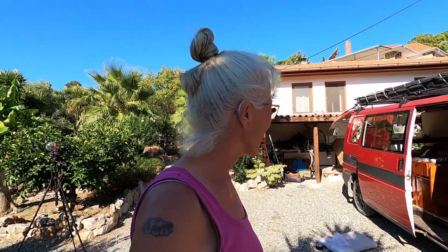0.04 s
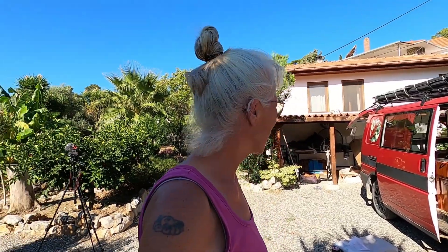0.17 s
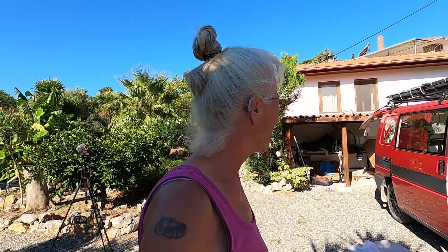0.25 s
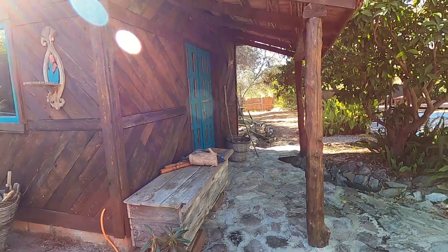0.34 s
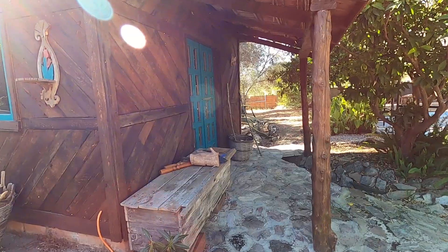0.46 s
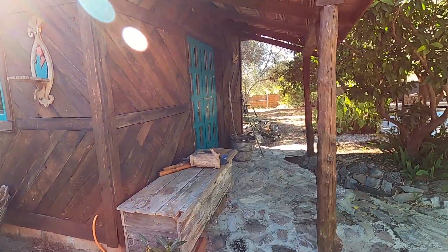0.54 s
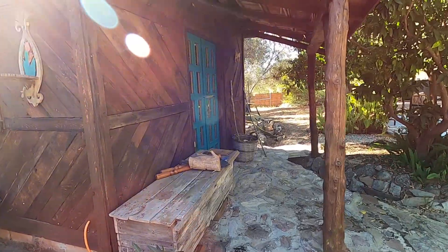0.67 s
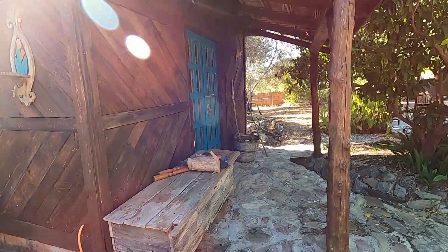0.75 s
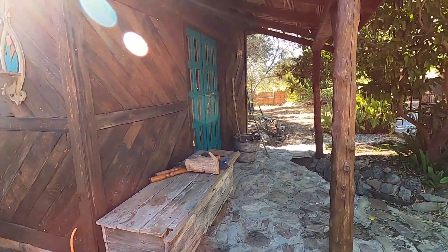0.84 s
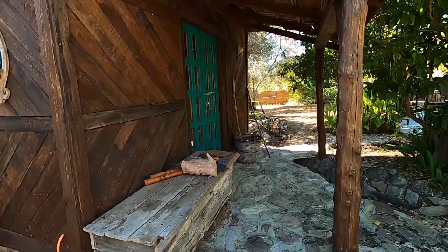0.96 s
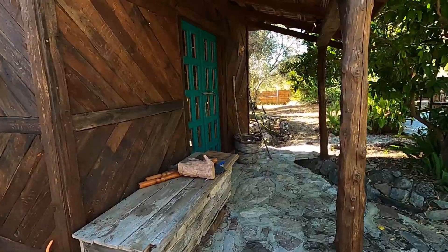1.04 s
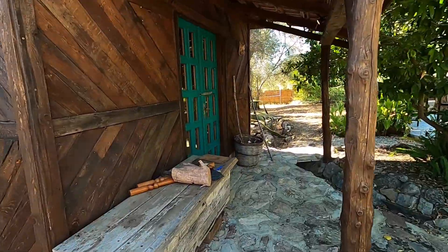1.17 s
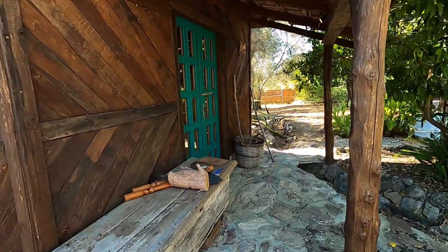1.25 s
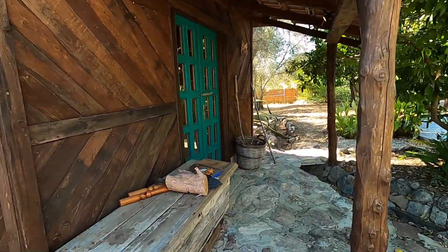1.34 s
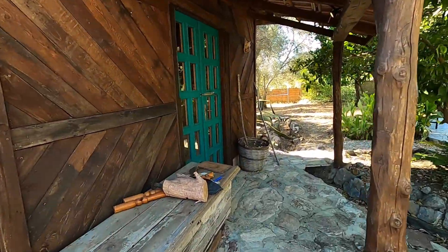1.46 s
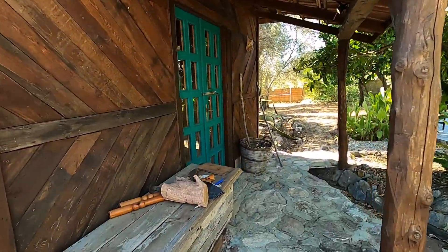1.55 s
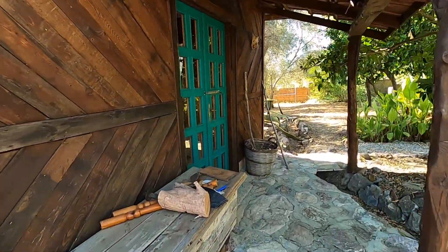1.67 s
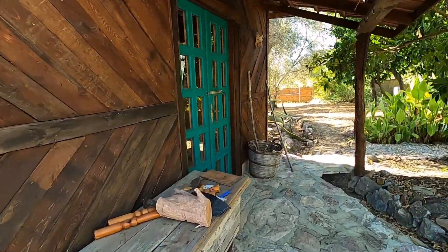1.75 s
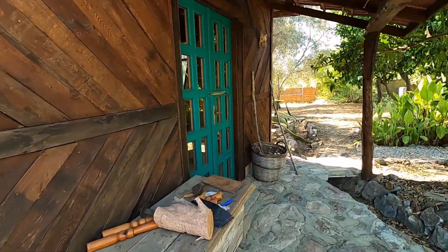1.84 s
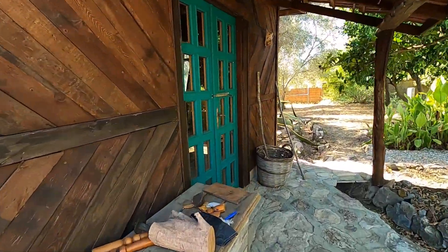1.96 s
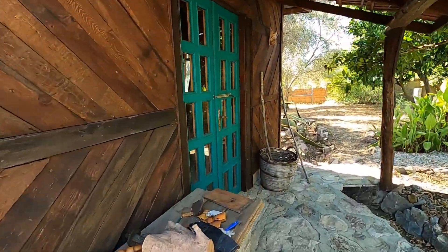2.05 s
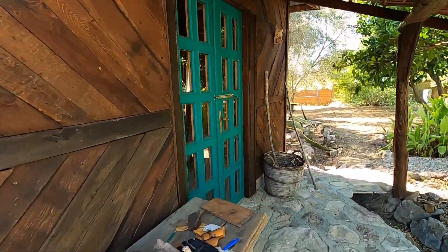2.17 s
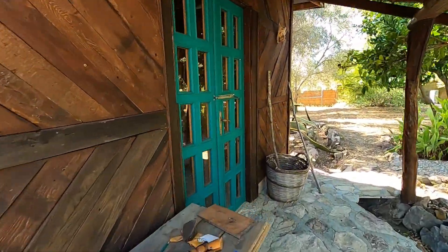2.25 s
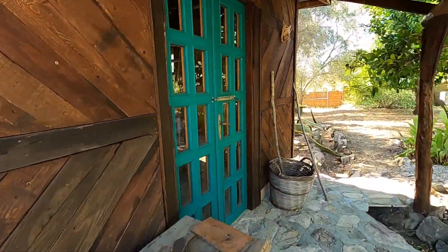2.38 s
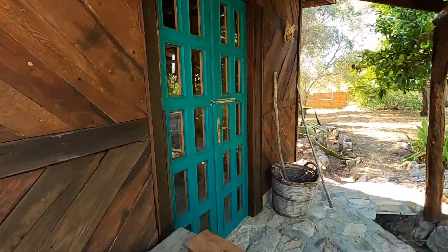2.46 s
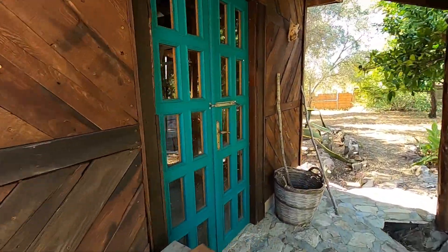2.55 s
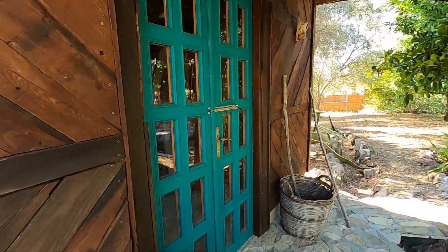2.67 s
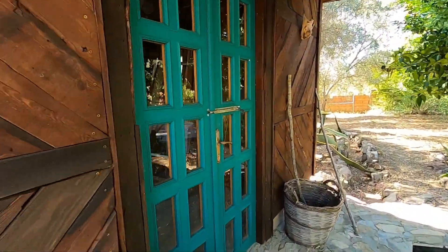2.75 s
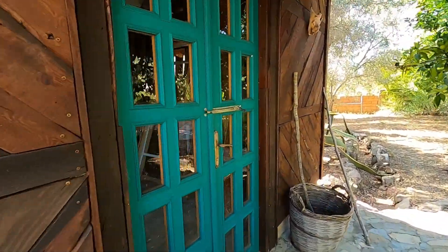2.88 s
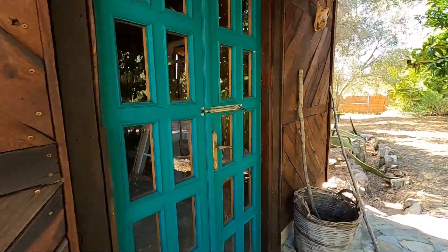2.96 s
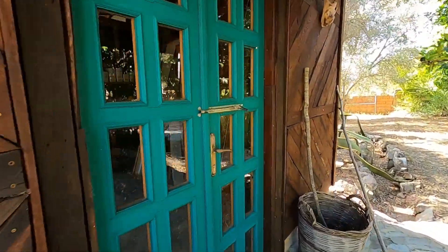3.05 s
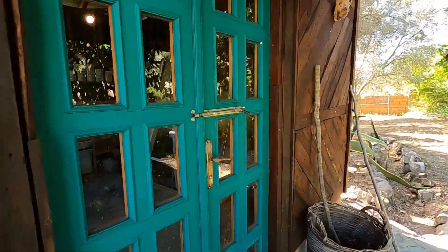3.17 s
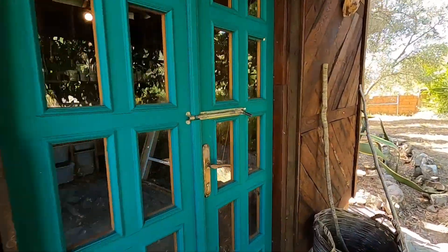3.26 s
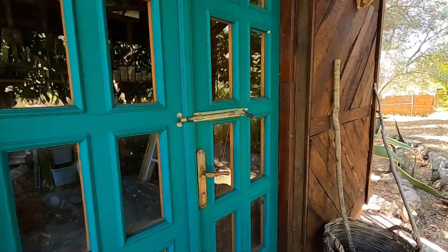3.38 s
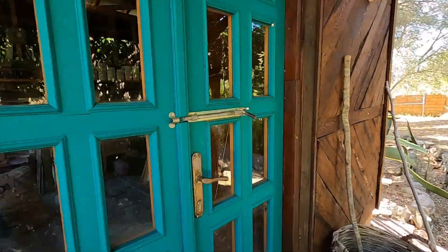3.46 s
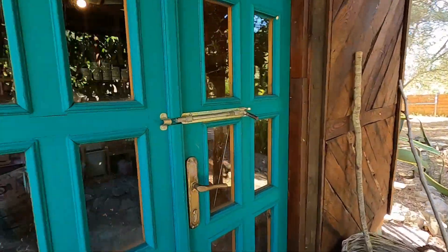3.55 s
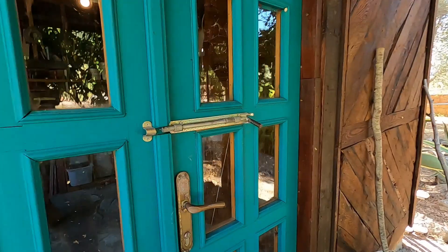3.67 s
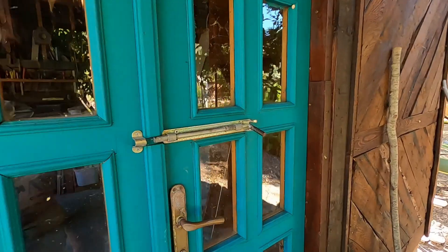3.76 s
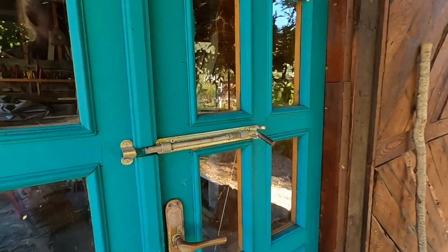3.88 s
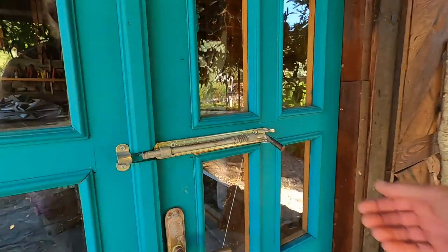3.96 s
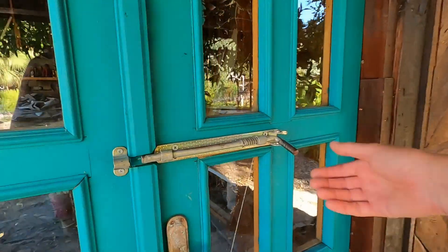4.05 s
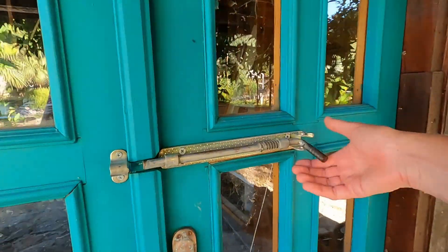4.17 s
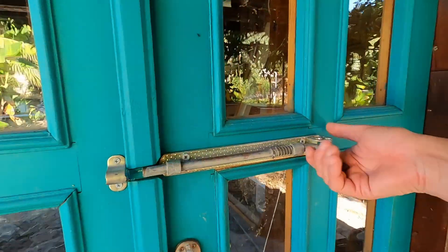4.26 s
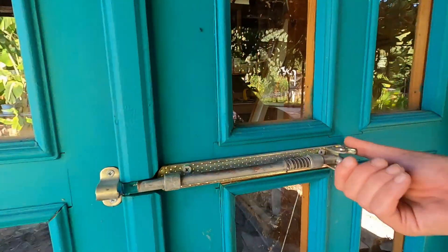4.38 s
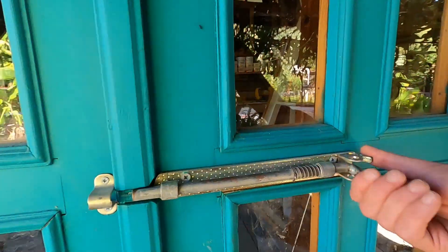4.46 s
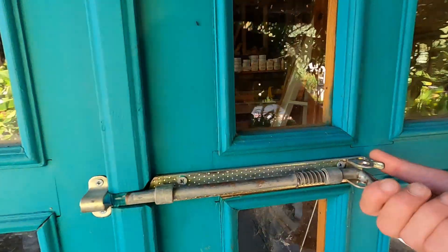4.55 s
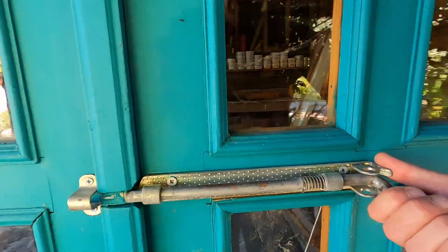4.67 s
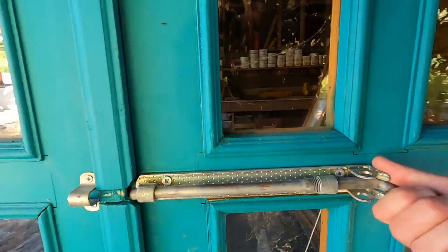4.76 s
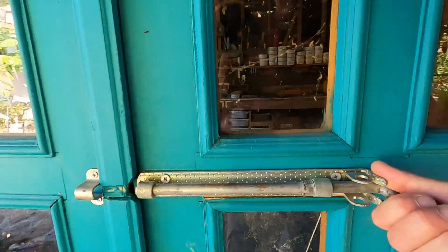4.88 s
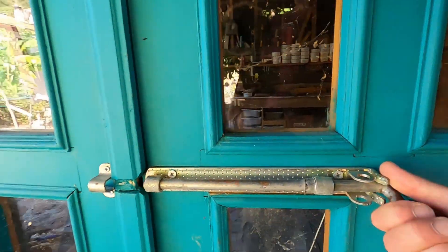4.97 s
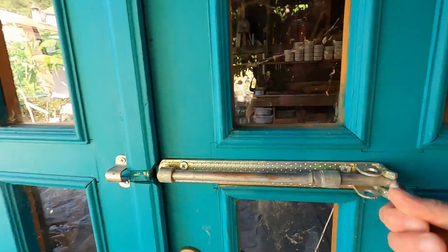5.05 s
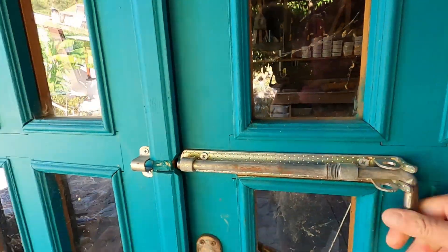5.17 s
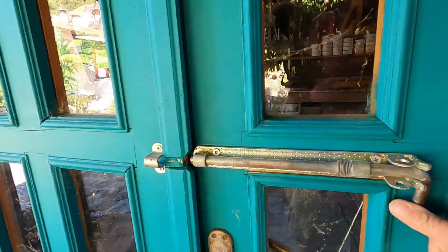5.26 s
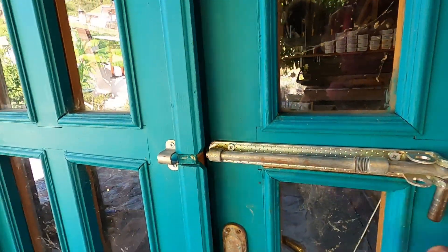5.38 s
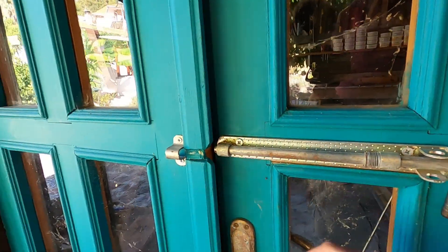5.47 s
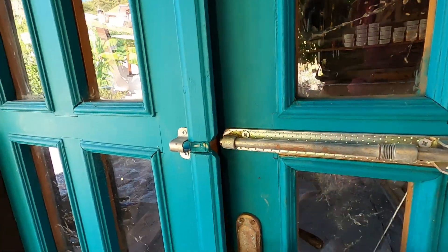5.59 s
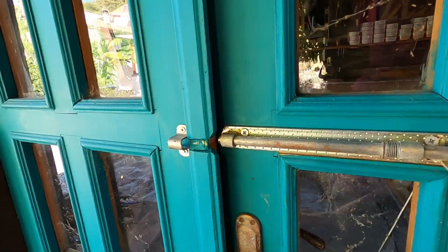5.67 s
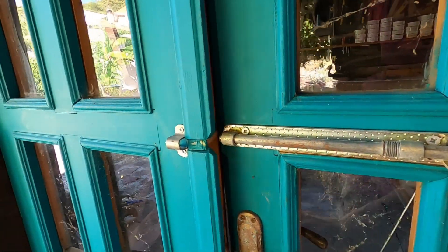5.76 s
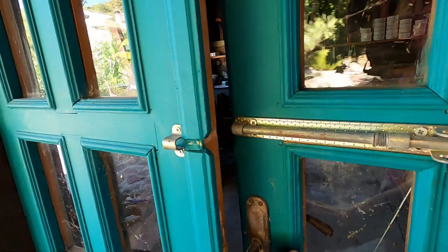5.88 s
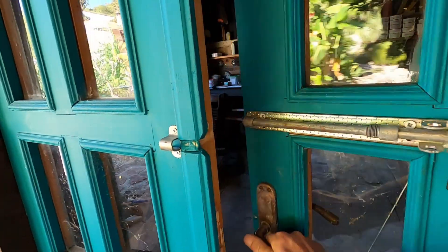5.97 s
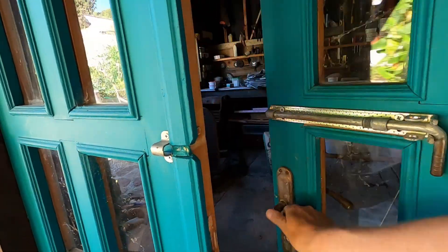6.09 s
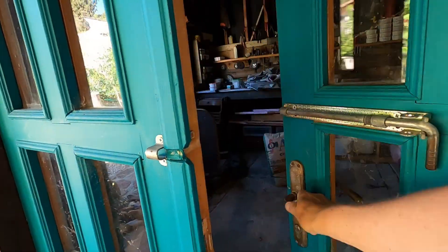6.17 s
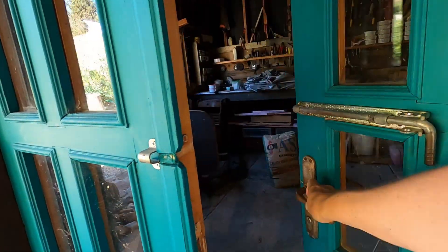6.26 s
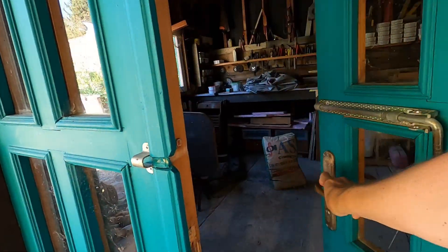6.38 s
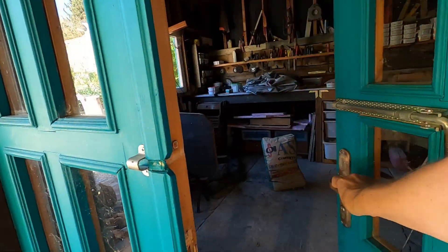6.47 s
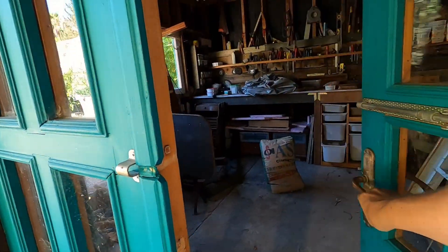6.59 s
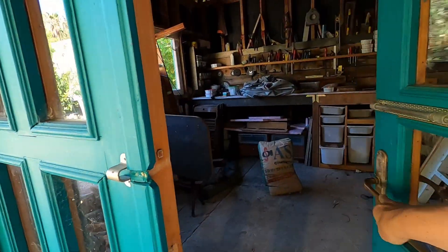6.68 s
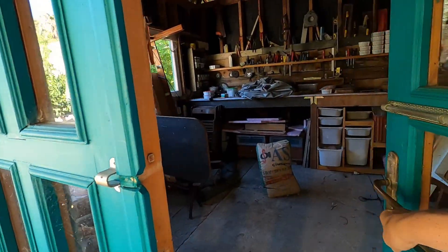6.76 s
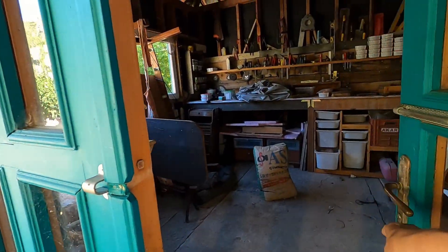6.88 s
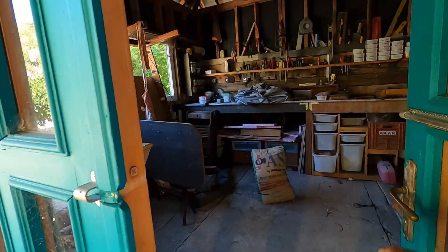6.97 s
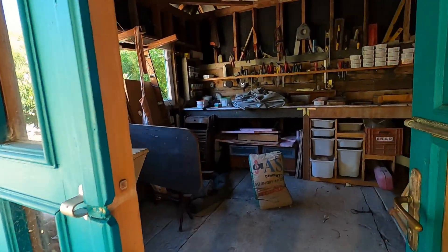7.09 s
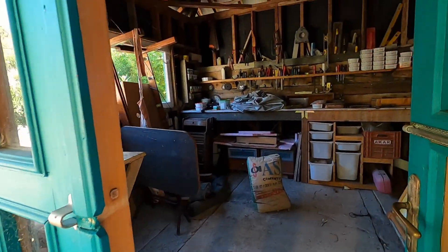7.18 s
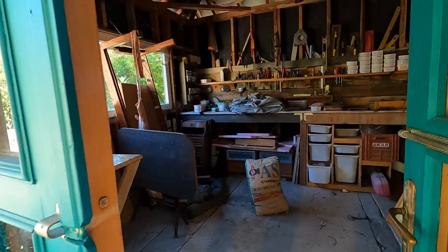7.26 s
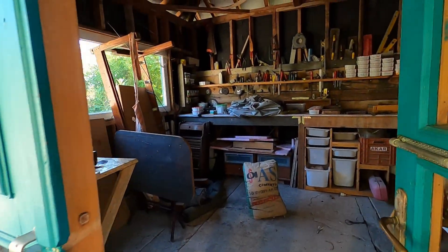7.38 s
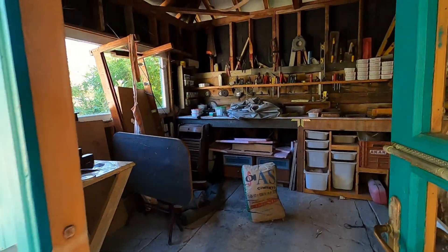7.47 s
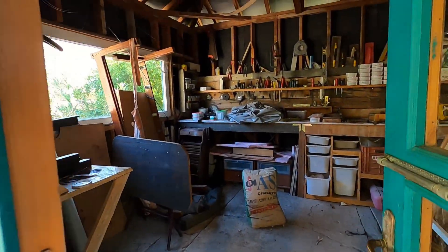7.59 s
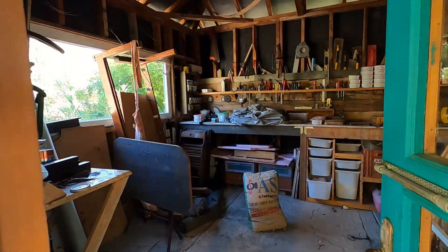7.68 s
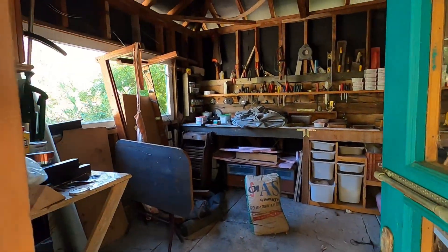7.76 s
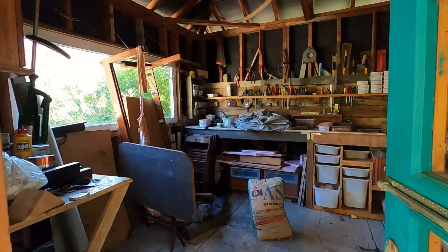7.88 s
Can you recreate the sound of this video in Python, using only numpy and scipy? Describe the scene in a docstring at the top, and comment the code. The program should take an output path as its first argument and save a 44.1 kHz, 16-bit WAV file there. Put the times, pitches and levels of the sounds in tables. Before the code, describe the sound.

On a shady porch, cicadas buzz in about eight pulses a second while a carried microphone gives soft, gritty double thumps. The sound cuts out briefly near the start. A close brass bolt then scrapes, squeaks and clacks very loudly, rattling against its stop while the wooden door shudders. The leaf knocks free, swings with a soft low rub, and its hinge ticks drily at the end.

```python
"""Soft double thumps come as the microphone is carried along a porch while cicadas chirr;
the sound soon drops out for a moment and returns.
A brass slide bolt is gripped, turned and dragged back, squeaking, until it rattles against its stop.
A glazed wooden door is pushed free of its frame and swings open with a soft rub.
Blows ring sets of resonances, rubbing is a stream of tiny blows, squeaks are gliding tones,
thumps are filtered fading pulses, and the cicadas and the open air are shaped noise."""
import sys
import numpy as np
from scipy import signal
from scipy.fft import rfft, irfft, next_fast_len
from scipy.io import wavfile
from scipy.ndimage import uniform_filter1d

SR = 44100
rng = np.random.default_rng(int(sys.argv[2]) if len(sys.argv) > 2 else 0)


def dump(signal):
    """Clip the signal to [-1, 1] and save it as 16-bit WAV at the path in sys.argv[1]."""
    limited = np.clip(np.atleast_2d(signal).T, -1, 1)
    pcm = np.round(limited * 32767).astype(np.int16)
    wavfile.write(sys.argv[1], SR, pcm)


N = 349676
TIME = np.arange(N) / SR

# resonances of the bolt and its plate: pitch_hz, width_hz, level_db
BRASS_MODES = [(982, 36, 0), (1200, 24, -5), (1290, 26, -5), (1470, 36, -3), (1770, 40, -4), (2110, 36, -7),
               (2331, 32, -3), (2520, 36, 1), (2770, 60, -3), (3001, 30, -4), (3053, 30, -4),
               (3215, 26, -3), (3520, 60, -6), (3870, 60, -5), (4802, 28, -5), (5189, 26, -4),
               (5840, 30, -9), (6100, 50, -9), (6880, 44, -6), (7420, 40, -7), (8200, 70, -13),
               (9700, 40, -12)]
# colour of the dense crack that fills in between them: pitch_hz, level_db
BRASS_CRACK = [(150, 2.5), (600, -23), (1200, 3.5), (2600, 4.5), (4500, 2.5), (7500, -0.5), (10000, -7),
               (13000, -10), (16000, -17)]
# hand movements, shared with the door: start_s, length_s, scrape_db (brass), rub_db, rumble_db (both wood)
STROKES = [(4.054, 0.047, -36.5, -48.5, -68), (4.21, 0.62, -53, -56, -55.5), (4.674, 0.14, -37.5, -31, -32),
           (4.888, 0.25, -43, -43, -43), (5.066, .12, -40, -35, -43), (5.184, 0.094, -29, -30, -42.5),
           (5.569, 0.23, -56, -50.5, -45.5), (5.944, .07, -41.5, -45.5, -66),
           (6.033, 0.18, -39, -38, -35.5), (6.805, 0.051, -54.5, -40.5, -52)]
STROKE_ATTACK_S = 0.0069
# brass striking brass: start_s, level_db, treble_db, ring_s (time for the added fade to fall 20 dB)
CLICKS = [(4.055, -32.5, -10, 0.02), (4.076, -28.5, -0.5, 0.097), (4.608, -27, 4, 0.01),
          (4.66, -26, 19, .02), (4.682, -1.5, 2.5, 0.022), (4.8097, -7, -10, 0.009),
          (4.932, -44, -18, .016), (5.06, -29, -21, 0.064), (5.118, -25.5, -31, .03),
          (5.164, -27, -14, 0.029), (5.188, -20, -25, .04), (5.202, -7.5, -26, 0.039),
          (5.21, -11, -15, 0.014), (5.245, -12, -37, 0.02), (5.253, -14, -29, 0.058),
          (5.276, -18.5, -34, 0.021), (5.3, -46, -4, 0.017), (5.337, -35, 18, .025), (5.445, -30, 6, .037),
          (5.747, -32, 5, 0.019), (5.945, -34, 17, 0.018), (6.028, -30.5, 24, .06),
          (6.06, -29.5, -5, 0.037), (6.081, -29.5, -2, .034), (6.175, -30, 2, 0.037),
          (6.191, -31.5, 17, .031), (6.282, -40, -1, 0.041), (6.778, -42, -1, 0.027)]


def bolt(longest_bounce_s=0.0038, bounce_db=-8):
    """The bolt clacks in its guides, bounces once each time, and scrapes between the clacks."""
    clacks, effort = np.zeros(N), np.zeros(N)
    for at, db, treble_db, ring_s in CLICKS:
        bounce_delay = longest_bounce_s * rng.uniform(.5, 1)
        for delay, drop_db in (0, 0), (bounce_delay, bounce_db):
            clack = ring(BRASS_MODES, BRASS_CRACK, crack_db=8.0, t60=0.07)
            clack = brighten(clack, treble_db, corner_hz=4060) * fade(3 * ring_s, size=7000)
            add(clacks, at + delay, amp(db + drop_db) * unit(clack, count=200))
        # the scrape grows by 60 dB in 0.035 s just before the bolt strikes
        run_up = fade(.035)[::-1]
        add(effort, at - len(run_up) / SR, amp(db - 8) * run_up)
    for start, length, scrape_db, _, _ in STROKES:
        movement = stroke(start, length, STROKE_ATTACK_S, t60=0.17)
        effort = np.maximum(effort, amp(scrape_db) * movement)
    scrape = friction(BRASS_MODES, BRASS_CRACK, rate=1100, spread_db=6, crack_db=7, t60=.016)
    scrape = unit(brighten(scrape, treble_db=-6.5, corner_hz=4000))
    return clacks + scrape * effort


# surfaces sticking and slipping fast enough to sing:
# centre_s, length_s, start_hz, end_hz, level_db, octave_db, waver (typical pitch error as a share)
SQUEAKS = [(4.676, 0.0078, 4000, 4460, -27, 9, 0.018), (4.791, 0.025, 3450, 3570, -28, -22, 0.036),
           (4.936, 0.01, 1540, 1586, -33, -19, 0.033), (4.993, 0.058, 2076, 2142, -19, -23, 0.01),
           (5.117, 0.049, 4110, 4050, -30.5, -32, 0.0033), (5.123, 0.017, 2730, 2670, -28, -21, 0.022),
           (5.609, 0.061, 188.4, 178, -26.5, -32, 0.074), (6.037, 0.03, 3960, 3660, -27, -8, 0.12),
           (6.058, .016, 3810, 3970, -31.5, -9, 0.057)]


def squeaks():
    """Stick and slip sings a gliding tone and its octave; an unsteady grip makes some of them hoarse."""
    out = np.zeros(N)
    for centre, length, start_hz, end_hz, db, octave_db, waver in SQUEAKS:
        size = int(length * SR)
        wobble = unit(uniform_filter1d(rng.standard_normal(size), size=60))
        hz = np.linspace(start_hz, end_hz, size) * (1 + waver * wobble)
        phase = 2 * np.pi * np.cumsum(hz) / SR
        tone = np.sin(phase) + amp(octave_db) * np.sin(2 * phase)
        add(out, centre - length / 2, np.sqrt(2) * amp(db) * np.hanning(size) * tone)
    return out


# resonances of the door leaf and its panes: pitch_hz, width_hz, level_db
WOOD_MODES = [(84, 14, -12), (110, 18, -8), (177, 22, -2), (245, 30, -9), (295, 30, -10), (372, 24, -4),
              (434, 26, -1), (478, 30, -5), (628, 45, -2), (760, 58, -9), (985, 40, -1), (1200, 40, -6),
              (1500, 55, -9)]
# colour of the dense crack that fills in between them: pitch_hz, level_db
WOOD_CRACK = [(50, -10), (170, -1), (450, -1), (1000, -4), (1700, -9), (3000, -22), (8000, -42)]
# blows into the leaf: start_s, level_db, pitch_hz (of the spot that is struck)
KNOCKS = [(4.113, -39.5, 267), (4.322, -32.5, 179), (4.683, -13, 483), (4.688, -22, 170), (4.811, -11, 464),
          (4.817, -18.5, 191), (5.063, -27, 556), (5.204, -18, 694), (5.224, -19, 450), (5.245, -19.5, 590),
          (5.589, -33, 168), (5.687, -58, 159), (5.753, -39.5, 191), (6.061, -29.5, 550), (6.092, -30, 220),
          (6.163, -25, 1530), (6.177, -19, 1430), (6.207, -29.5, 400)]
# dry hinge ticks as the door comes to rest: start_s, level_db
TICKS = [(7.411, -32), (7.468, -30), (7.644, -44)]
# colour of those ticks: pitch_hz, level_db
TICK_COLOUR = [(700, -26), (1300, -20), (1800, 12), (2700, 6.5), (4000, 4), (5000, 12), (8000, 0),
               (15000, -26)]
# resonances of the hinge rub: pitch_hz, width_hz, level_db
HINGE_MODES = [(376, 50, 6), (434, 78, 4.5), (548, 46, 0.5), (651, 19, -2.5), (1017, 34, -8.5),
               (1505, 46, -11), (1540, 18, -5.5), (2010, 44, -7.5), (2500, 170, 2), (3100, 500, -16)]
# colour of the deep rumble of the moving leaf: pitch_hz, level_db
RUMBLE_COLOUR = [(40, -16.5), (70, 1.5), (120, 0.5), (240, -6.5), (450, -23), (1000, -44)]


def door(swing_t60=0.86):
    """The leaf booms and shudders under each blow, rubs and rumbles as it moves; its hinges grind and tick."""
    blows, rubbing = np.zeros(N), np.zeros(N)
    for at, db, hz in KNOCKS:
        knock = ring(WOOD_MODES, WOOD_CRACK, crack_db=-1.5, t60=0.085)
        knock = band(knock, hz / 2.2, hz * 1.9)
        add(blows, at, amp(db) * unit(knock, count=400))
        # the leaf and its loose panes shudder on
        add(rubbing, at, amp(db - 14) * fade(0.34, size=20000))
    for at, db in TICKS:
        tick = noise(TICK_COLOUR, size=12000) * fade(0.01)
        add(blows, at, amp(db) * unit(tick, count=200))

    # the foot of the opening door rumbles over the floor
    rumbling = amp(-37.5) * stroke(start=6.376, length=0.38, attack_s=0.28, t60=swing_t60)
    for start, length, _, rub_db, rumble_db in STROKES:
        movement = stroke(start, length, STROKE_ATTACK_S, t60=0.54)
        rubbing = np.maximum(rubbing, amp(rub_db) * movement)
        rumbling = np.maximum(rumbling, amp(rumble_db) * movement)
    # the hinge groans most towards the end of the swing
    swing = amp(-43) * stroke(start=6.324, length=0.44, attack_s=0.43, t60=swing_t60)

    rub = friction(WOOD_MODES, WOOD_CRACK, rate=600, spread_db=7, crack_db=4, t60=0.09)
    rub = unit(brighten(band(rub, 190, 9000), treble_db=-20.5, corner_hz=463))
    hinge = friction(HINGE_MODES, WOOD_CRACK, rate=240, spread_db=6, crack_db=-2, t60=.03)
    rumble = friction(WOOD_MODES[:2], RUMBLE_COLOUR, rate=300, spread_db=6, crack_db=10, t60=.06)
    return blows + rub * rubbing + rumble * rumbling + hinge * swing


# soft double thumps with grit: start_s, thump_db, grit_db, grit_pitch_hz
THUMPS = [(.224, -47, -47.5, 1470), (0.699, -46, -74, 700), (1.171, -34, -50, 1700),
          (1.672, -47, -48.5, 820), (1.744, -32.5, -52, 1060), (1.865, -33.5, -52.5, 950),
          (2.361, -36, -73, 700), (2.393, -42, -46.5, 1280), (2.452, -33, -53.5, 1400),
          (2.991, -52, -50, 1100), (3.078, -47, -46, 1750), (3.182, -32.5, -63, 700),
          (3.394, -38, -50, 1630), (3.575, -43, -49, 1430), (3.624, -32.5, -55, 700),
          (3.775, -33.5, -45, 1130)]


def double_thumps(second_lag_s=.035, second_db=-6.5):
    """Soft double thumps as the microphone is carried, the second weaker, each with a little grit."""
    out = np.zeros(N)
    for at, thump_db, grit_db, grit_hz in THUMPS:
        for delay, drop_db in (0, 0), (second_lag_s, second_db):
            thump = band(fade(0.043), 22, 256, order=1)
            # cubing the noise makes it crackle: a few grains stand out
            grit = band(rng.standard_normal(12000) ** 3, grit_hz / 2, grit_hz * 2) * fade(0.14)
            both = amp(thump_db) * unit(thump, count=400) + amp(grit_db) * unit(grit, count=400)
            add(out, at + delay, amp(drop_db) * both)
    return out


def porch(x, wet_db=-13, low_t60=0.18, high_t60=0.15):
    """Wall, roof and flagstones return a short tail that loses its treble first."""
    hiss = rng.standard_normal(20000)
    low_tail = band(hiss, 82, 2960) * fade(low_t60, size=20000)
    high_tail = band(hiss, 1300, 10700) * fade(high_t60, size=20000)
    tail = low_tail + amp(-0.5) * high_tail
    tail = tail * (1 - np.exp(-TIME[:len(tail)] / 0.0026))
    return x + amp(wet_db) * signal.fftconvolve(x, tail / np.linalg.norm(tail))[:N]


# cicada resonances: pitch_hz, width_hz, level_db, lag_chirps, throb_db (swing each way)
CICADAS = [(4646, 950, -1, 0.04, 3.5), (5324, 590, -0.5, 0.058, 5), (6260, 1090, 2.5, 0.38, 3),
           (7275, 650, 0.5, 0.42, 1.5), (7874, 1060, 0.5, 0.1, 4), (8850, 3000, -7, 0.12, 2)]
# loudness of the whole song as the microphone is carried: time_s, level_db
SONG_LEVEL = [(0, -49), (.3, -47), (.8, -49.5), (1.9, -44.5), (2.5, -43.5), (4.4, -43.5), (5.9, -43.5),
              (7.1, -47.5), (7.93, -48.5)]
# how the hut shades the leading cicada: time_s, level_db
SHADE = [(.3, 1.5), (.55, -9), (.95, -2), (1.4, 0)]
# pace of the song, which settles early on: time_s, chirps_per_s
CHIRP_RATE = [(1.3, 8.9), (2.2, 7.85)]


def cicadas(tymbal_hz=125, buzz=0.23, waver_db=0.94, echo_s=.0033, echo_db=-8):
    """Tymbals buzz in a few resonances that swell in turn, about eight chirps a second; the ground echoes."""
    chirp = np.cumsum(curve(CHIRP_RATE)) / SR
    chirp = chirp - np.interp(2.95, TIME, chirp)  # a chirp with no lag peaks at 2.95 s
    out = 0
    for hz, width_hz, db, lag, throb_db in CICADAS:
        waver = unit(uniform_filter1d(rng.standard_normal(N), size=3000))
        tymbal_phase = 2 * np.pi * np.cumsum(tymbal_hz * (1 + 0.089 * waver)) / SR
        clicks = rng.standard_normal(N) * (1 + buzz * np.sin(tymbal_phase))
        song = unit(band(clicks, hz - width_hz / 2, hz + width_hz / 2, order=3))
        throb = throb_db * np.cos(2 * np.pi * (chirp - lag))
        leads = lag < .2  # these resonances belong to the leading cicada
        out = out + song * amp(db + throb + waver_db * waver + leads * curve(SHADE))
    echo = amp(echo_db) * np.roll(out, int(echo_s * SR))
    return unit(out + echo) * amp(curve(SONG_LEVEL))


# colour of the open air: pitch_hz, level_db (per Hz)
AIR_COLOUR = [(20, 11), (50, 6), (90, 2), (180, -2), (350, -4), (560, -3.5), (1200, -7), (2000, -11),
              (3500, -14), (9000, -14), (12000, -18), (16000, -25)]
# colour of slow pressure swings on the moving microphone: pitch_hz, level_db (per Hz)
SWAY_COLOUR = [(1, 10), (4, 4), (8, -12.5), (13, 4.5), (17, -27), (30, -33), (50, -41), (100, -67),
               (300, -110)]
# faint far hum at the start: pitch_hz, level_db
HUM = (548, -62.5)
# the moment without sound: start_s, end_s
SILENCE = (0.3137, 0.5046)


def air(air_db=-54, sway_db=-17.5):
    """Noise for open air that wavers a little, slow pressure swings on the microphone, and a far hum."""
    slow = uniform_filter1d(rng.standard_normal(N), size=4000)
    waver_db = 0.42 * unit(uniform_filter1d(slow, size=4000))
    hum_hz, hum_db = HUM
    hum = unit(band(rng.standard_normal(N), hum_hz - 6, hum_hz + 6))
    hum = amp(hum_db) * hum * (TIME < SILENCE[1])
    sway = noise(SWAY_COLOUR, N) * signal.windows.tukey(N, .03)
    return amp(air_db + waver_db) * noise(AIR_COLOUR, N) + amp(sway_db) * sway + hum


def ring(modes, colour, crack_db, t60, scatter_db=2, size=7000):
    """A body's answer to one blow: its resonances, shared out anew each time, and a short dense crack."""
    hz, width, db = np.transpose(modes)[:, :, None]
    t = TIME[:size]
    gain = amp(db + scatter_db * rng.standard_normal(hz.shape))
    waves = np.sin(2 * np.pi * (hz * t + rng.random(hz.shape)))
    # a wider resonance dies away sooner
    tones = np.sum(gain * np.exp(-np.pi * width * t) * waves, axis=0)
    crack = noise(colour, size) * fade(t60, size)
    body = unit(tones, count=200) + amp(crack_db) * unit(crack, count=200)
    return body * (1 - np.exp(-t / 0.00074))


def friction(modes, colour, rate, spread_db, crack_db, t60, count=4):
    """Stick and slip: uneven tiny jerks (rate per s) at a few contact points, in spurts, each shake the body."""
    # surfaces catch and let go: a level drifting over about 0.02 s, at most 5 dB each way
    drift = unit(uniform_filter1d(rng.standard_normal(N), size=int(.02 * SR)))
    spurts = amp(2.5 * np.clip(drift, -2, 2))
    out = 0
    for _ in range(count):
        happens = rng.random(N) < rate / count / SR
        strength = amp(spread_db * np.clip(rng.standard_normal(N), -2, 2))
        jerks = happens * strength * spurts * rng.choice([-1, 1], N)
        out = out + signal.oaconvolve(jerks, ring(modes, colour, crack_db, t60))[:N]
    return unit(out)


def stroke(start, length, attack_s, t60):
    """Gain of one movement: it gathers speed, holds, and dies away."""
    rise = np.clip((TIME - start) / attack_s, 0, 1)
    return rise * np.exp(-np.log(1000) * np.maximum(TIME - start - length, 0) / t60)


def amp(db):
    """Turn decibels into a plain gain."""
    return 10 ** (np.asarray(db) / 20)


def curve(rows):
    """Rows of (time_s, value) joined by straight lines."""
    return np.interp(TIME, *np.transpose(rows))


def unit(x, count=None):
    """Scale to rms 1 over the first count samples, or over all of them."""
    return x / np.sqrt(np.mean(x[:count] ** 2))


def noise(points, size):
    """Noise of rms 1 whose spectrum follows (pitch_hz, level_db) points."""
    hz, db = np.transpose(points)
    length = next_fast_len(size)
    log_hz = np.log(np.fft.rfftfreq(length, 1 / SR) + 1e-9)
    gain = amp(np.interp(log_hz, np.log(hz), db))
    return unit(irfft(rfft(rng.standard_normal(length)) * gain, length)[:size])


def band(x, lo_hz, hi_hz, order=2):
    """Keep the pitches between two limits."""
    edges = [lo_hz, min(hi_hz, SR / 2 - 1)]
    return signal.sosfilt(signal.butter(order, edges, "band", fs=SR, output="sos"), x)


def brighten(x, treble_db, corner_hz):
    """A treble shelf: harder contact gives more treble."""
    low = signal.lfilter(*signal.butter(1, corner_hz, fs=SR), x)
    return low + amp(treble_db) * (x - low)


def fade(t60, size=12000):
    """A dying gain that falls by 60 dB in t60 seconds."""
    return np.exp(-np.log(1000) * TIME[:size] / t60)


def add(track, at, sound):
    """Mix a sound into a track at a time in seconds."""
    start = int(at * SR)
    track[start:start + len(sound)] += sound[:N - start]


def scene():
    """Everything lies straight ahead; the two ears differ only a little."""
    near = porch(bolt() + squeaks() + door() + double_thumps())
    song = cicadas()
    mid = near + song + air()
    aside = amp(-49.5) * brighten(near, treble_db=12, corner_hz=3000) + amp(-44) * song
    side = band(np.roll(aside, shift=150), 60, 16000) + amp(-72) * noise(AIR_COLOUR, N)
    return np.array([mid + side, mid - side])


def record(dry, ceiling_db=2.5, recover_db_per_s=14, top_hz=16100):
    """The sound drops out for a moment, a limiter ducks loud peaks, overloads clip, and the top is cut."""
    start, end = SILENCE
    gate = np.maximum(np.clip((start - TIME) / 0.02, 0, 1), np.clip((TIME - end) / 0.07, 0, 1))
    peak_db = 20 * np.log10(np.abs(dry).max(axis=0) + 1e-9)
    over_db = np.maximum(peak_db - ceiling_db, 0)
    # the ducking jumps up with each peak and recovers at a steady pace
    recovery_db = recover_db_per_s * TIME
    duck_db = np.maximum.accumulate(over_db + recovery_db) - recovery_db
    gain = amp(-uniform_filter1d(duck_db, size=200)) * np.sin(np.pi / 2 * gate) ** 2
    sound = np.clip(dry * gain, -1, 1)
    return signal.sosfilt(signal.ellip(8, .2, 70, top_hz, fs=SR, output="sos"), sound)


dry = scene()
out = record(dry)
dump(out)
```